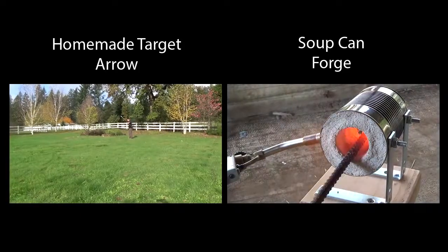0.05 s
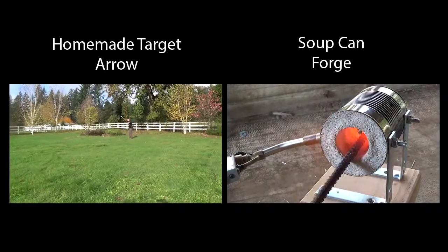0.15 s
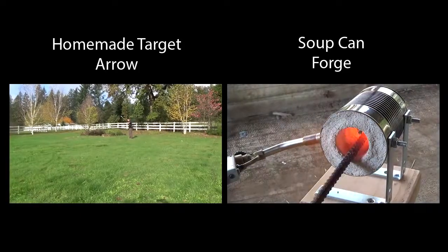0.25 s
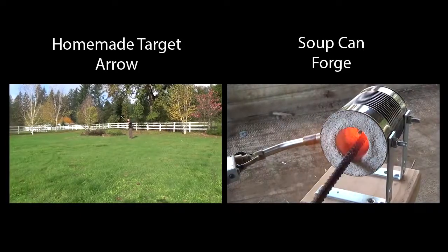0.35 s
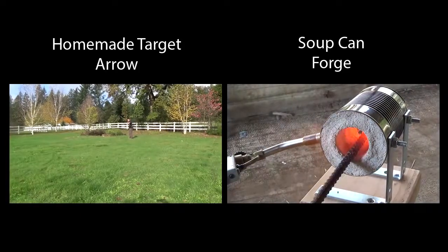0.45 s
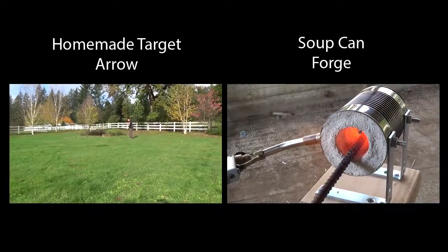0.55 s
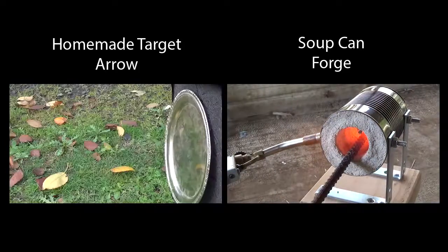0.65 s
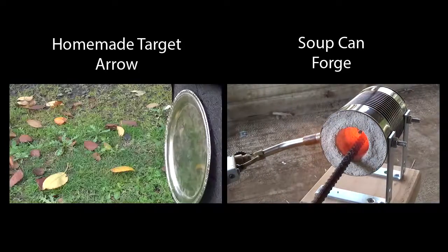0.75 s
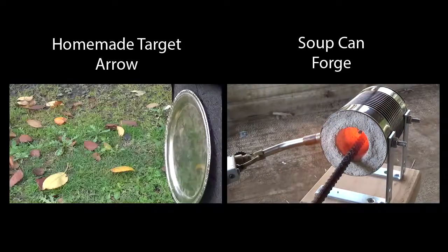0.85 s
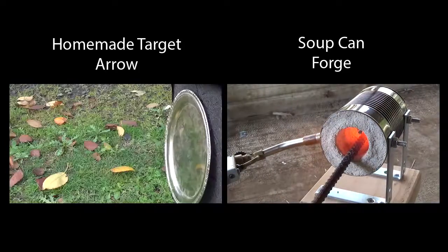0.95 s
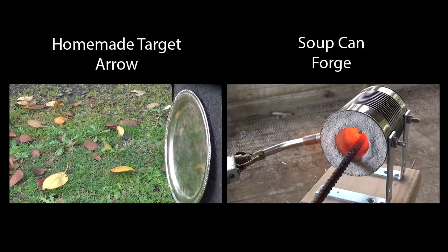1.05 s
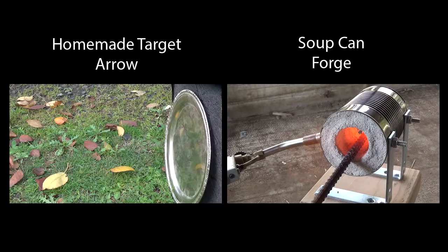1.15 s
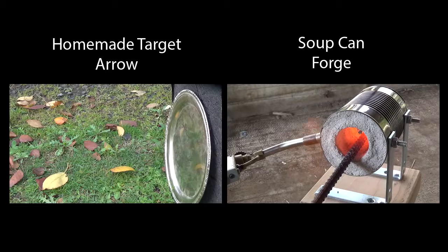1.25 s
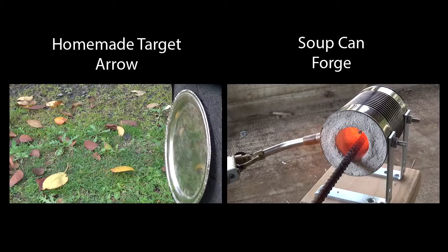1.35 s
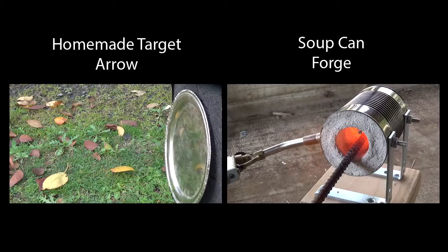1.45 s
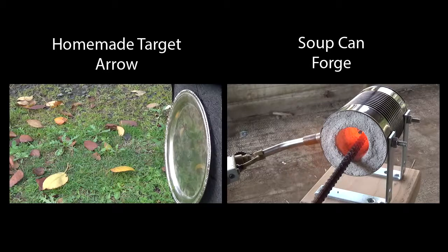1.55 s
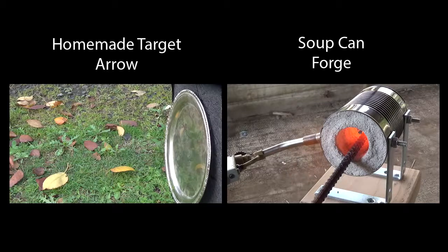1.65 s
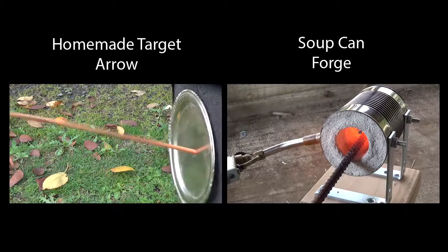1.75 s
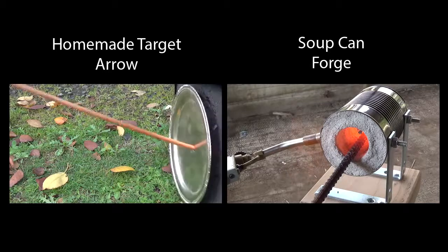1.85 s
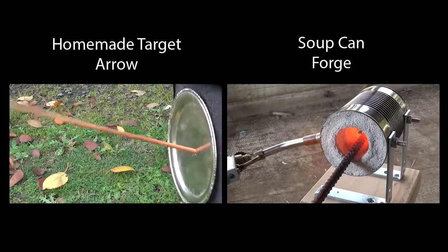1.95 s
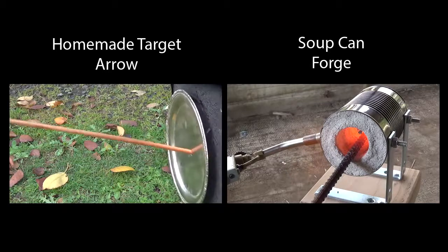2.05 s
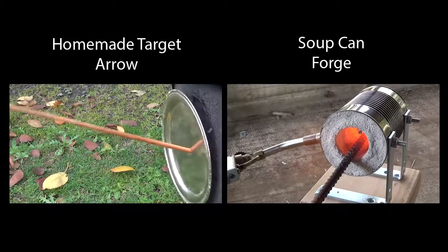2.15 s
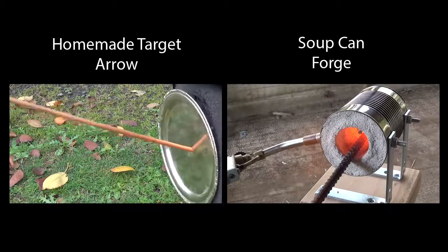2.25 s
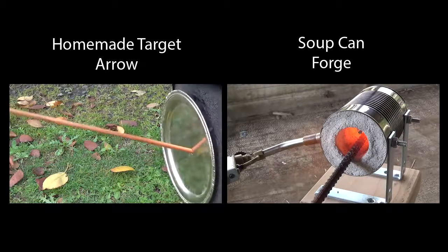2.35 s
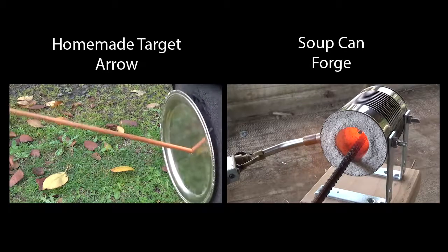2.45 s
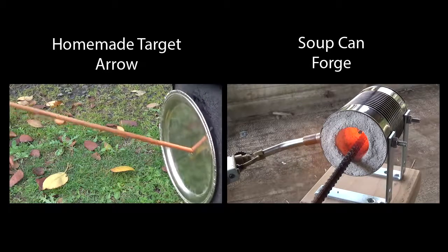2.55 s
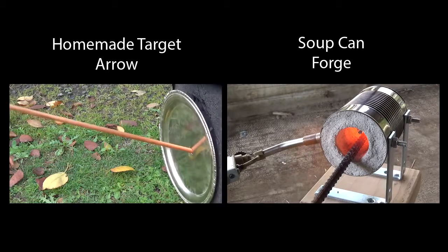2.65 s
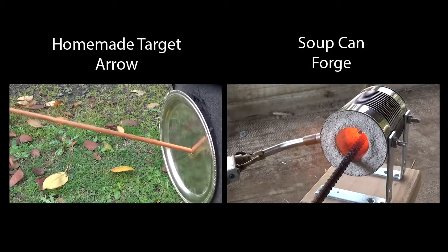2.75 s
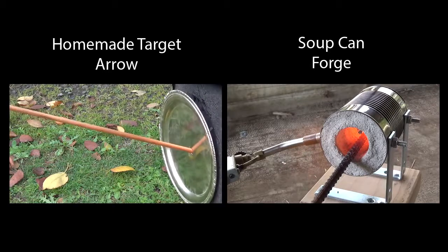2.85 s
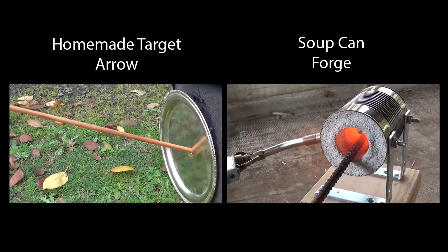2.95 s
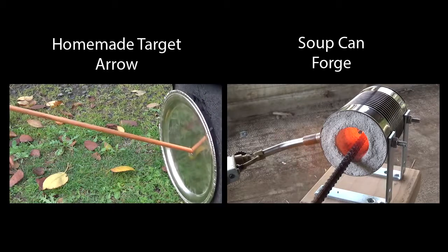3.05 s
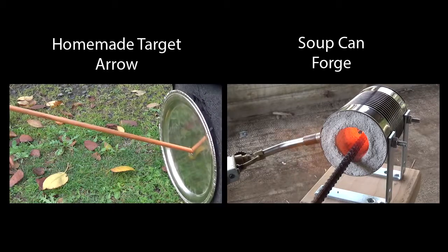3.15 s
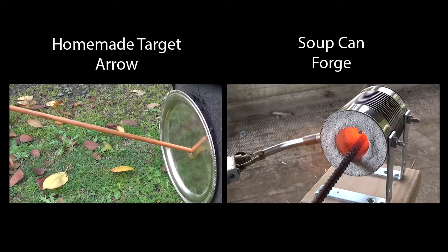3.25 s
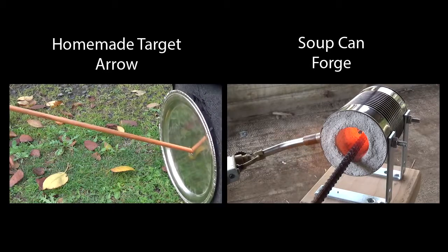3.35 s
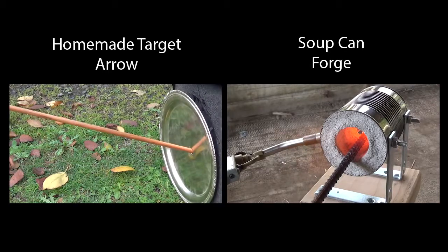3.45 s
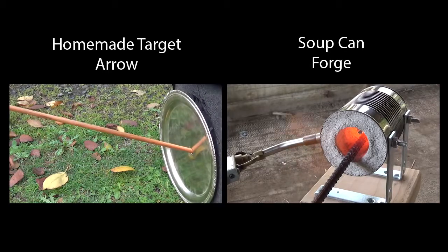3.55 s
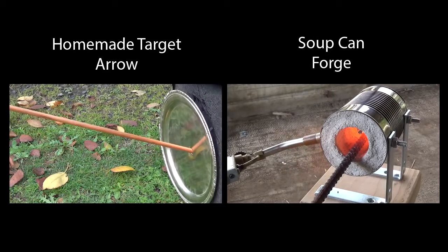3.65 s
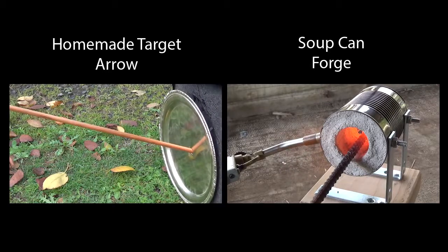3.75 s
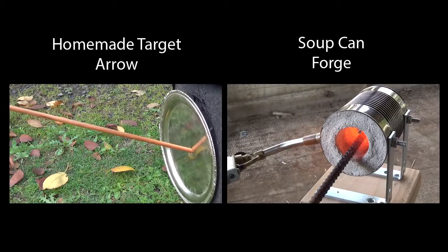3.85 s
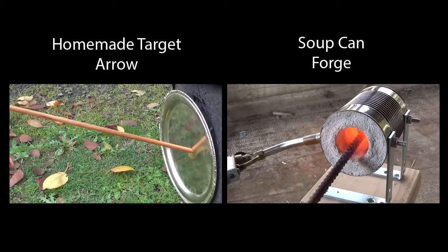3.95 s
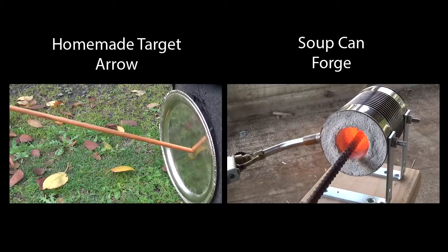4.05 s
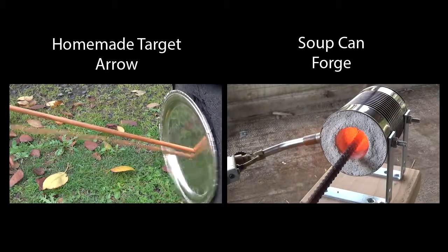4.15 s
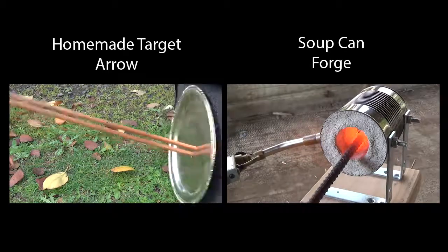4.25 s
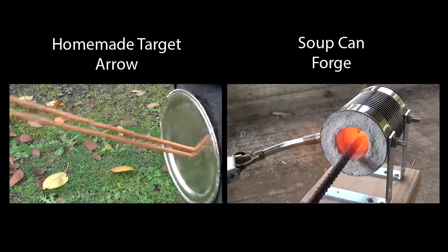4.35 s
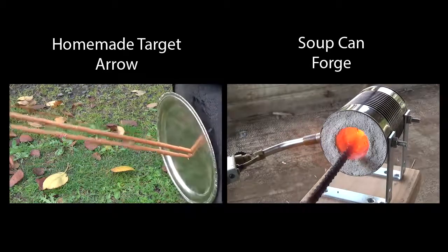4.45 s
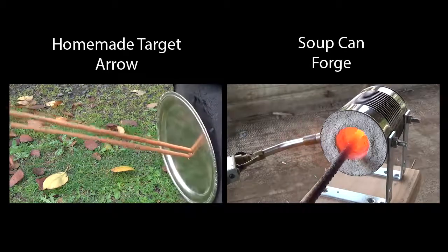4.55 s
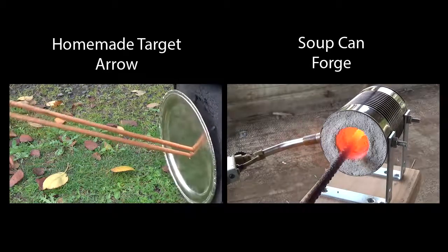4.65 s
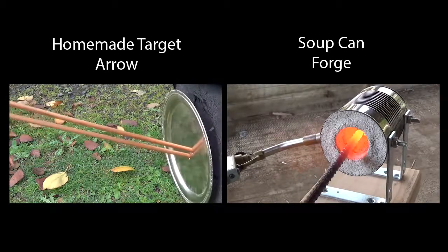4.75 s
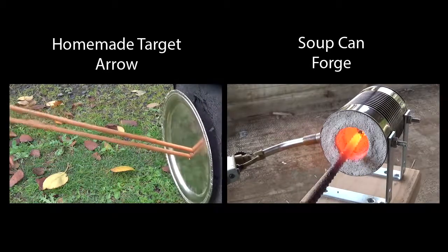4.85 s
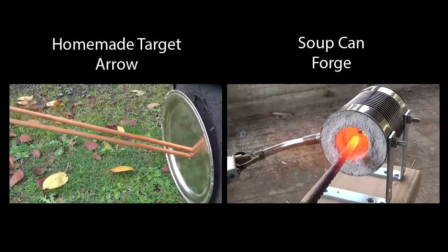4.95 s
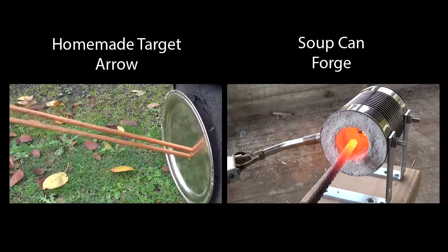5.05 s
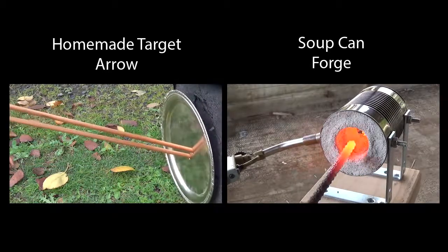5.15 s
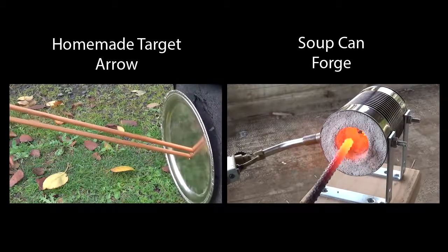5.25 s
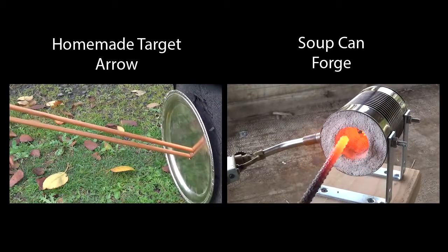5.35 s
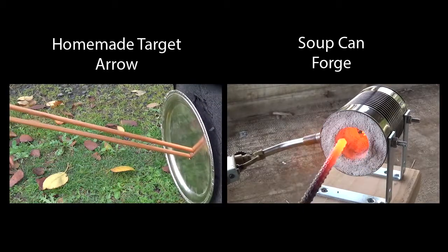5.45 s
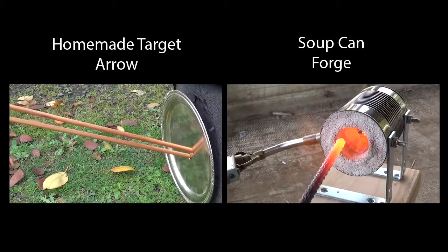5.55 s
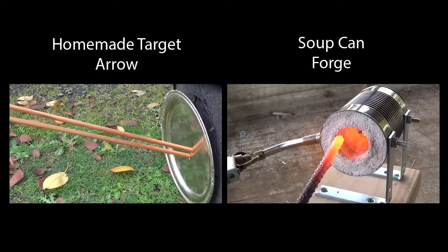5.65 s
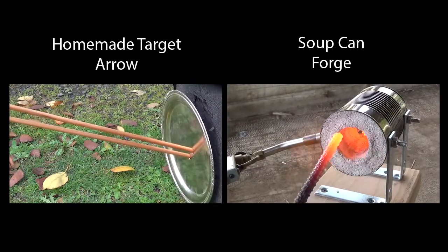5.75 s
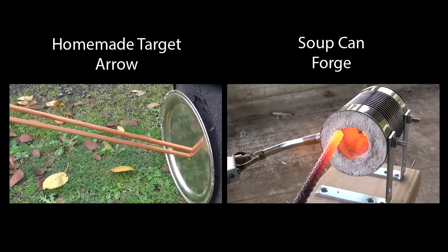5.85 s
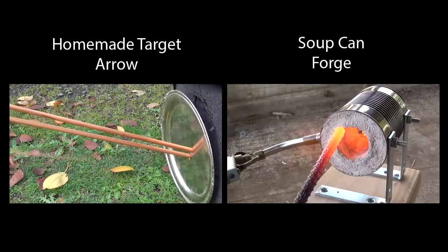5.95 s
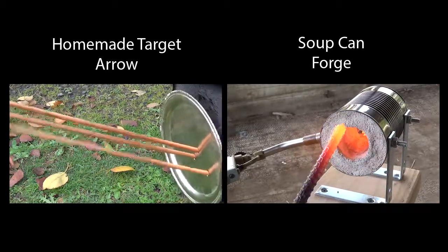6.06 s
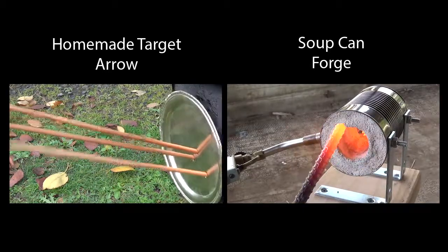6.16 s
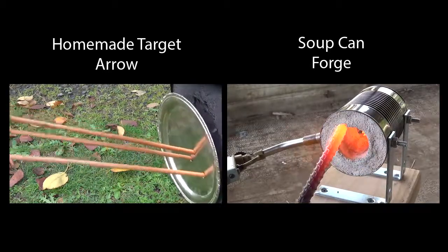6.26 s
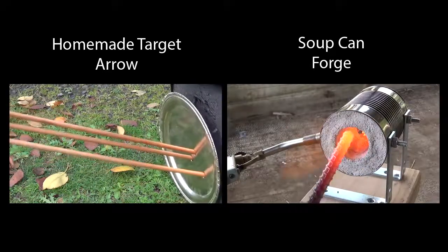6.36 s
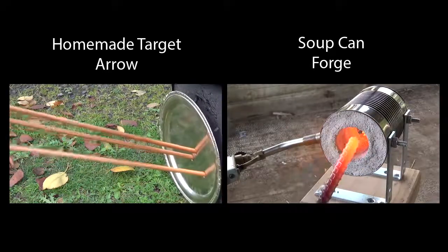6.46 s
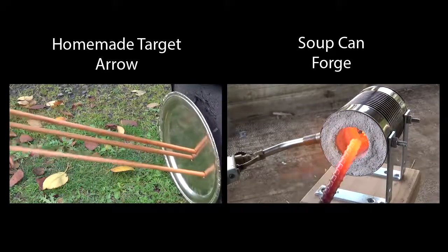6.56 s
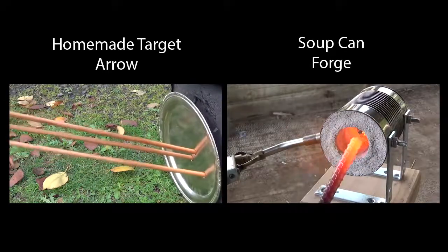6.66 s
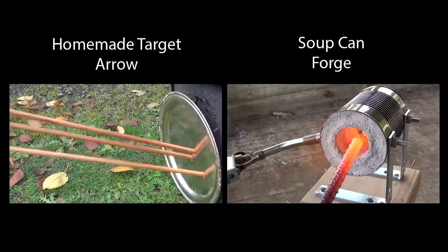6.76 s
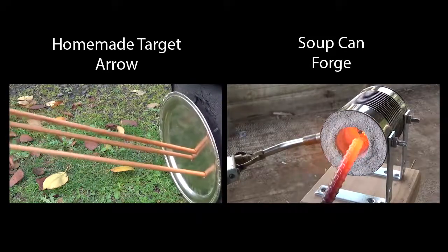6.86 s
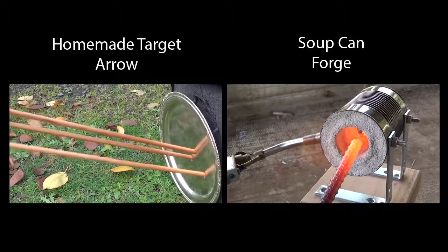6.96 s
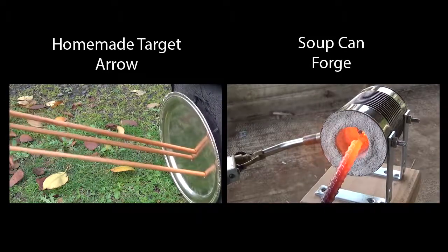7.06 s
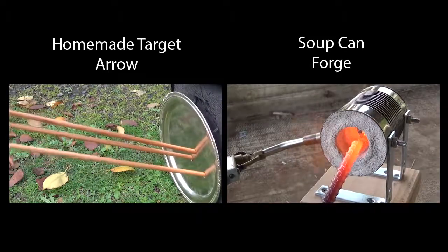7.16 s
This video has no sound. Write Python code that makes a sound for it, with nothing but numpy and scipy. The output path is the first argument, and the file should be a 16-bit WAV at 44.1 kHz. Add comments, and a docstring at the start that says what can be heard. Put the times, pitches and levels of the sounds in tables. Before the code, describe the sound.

Close bow shots punch three arrows into thin metal with rattling clangs outdoors, while a small gas forge blows steadily.

```python
"""Arrows through a metal platter

On a lawn, close to the microphone, three wooden arrows are shot through a thin metal platter. The
bowstring thumps, the point cracks through, and the sliding, rattling shaft keeps the platter ringing.
A gas torch blows steadily into a small tin-can forge, whose note shifts as an iron rod is drawn out.
Far off, an engine hums."""
import sys
import numpy as np
from scipy import signal
from scipy.fft import rfft, irfft
from scipy.io import wavfile

SR = 44100
rng = np.random.default_rng(int(sys.argv[2]) if len(sys.argv) > 2 else 0)


def file_out(sig):
    """Save sig as 16-bit WAV at sys.argv[1]."""
    # one column per channel
    cols = np.atleast_2d(sig).T
    # limit, then scale
    lim = np.clip(cols, -1, 1)
    pcm = np.round(lim * 32767).astype(np.int16)
    wavfile.write(sys.argv[1], SR, pcm)


N = 317069
TIME = np.arange(N) / SR
AGE = TIME[:SR]  # the second that follows a blow
LEFT_RIGHT = np.array([[1], [-1]])


def from_db(db):
    """Decibels to gain."""
    return 10 ** (np.asarray(db) / 20)


def rms_one(x):
    """Scale to unit rms."""
    return x / np.sqrt(np.mean(x ** 2) + 1e-20)


def at_hz(rows, hz):
    """The columns of a spectrum table, read on a log-frequency axis."""
    points, *columns = np.transpose(rows)
    return [np.interp(np.log(hz + 1e-9), np.log(points), c) for c in columns]


def bins(size):
    """Frequencies of a transform of this size."""
    return np.arange(size // 2 + 1) * SR / size + 1e-9


def treble(hz, corner_hz=5500):
    """How far a frequency belongs to the treble, 0-1."""
    return 1 / (1 + (corner_hz / hz) ** 4)


def noise(gain, size):
    """Noise with a given gain at each frequency."""
    return irfft(gain * rfft(rng.standard_normal(size)), size)


def flutter(rate_hz, size=SR):
    """A smooth random waver of unit rms."""
    return rms_one(noise(np.exp(-(bins(size) / rate_hz) ** 2), size))


def fade(t60):
    """Exponential decay, 60 dB in t60 seconds."""
    return from_db(-60 * AGE / t60)


def add(out, start_s, sound):
    """Mix in a one-second sound."""
    start = round(start_s * SR)
    out[:, start:start + SR] += sound[..., :N - start]


# Stereo picture at the microphone: freq_hz, left_minus_right_db, shot_side_db, forge_side_db
STEREO_IMAGE = [(40, -2, 3, 2), (70, -13.5, 1, -7), (142, -7, -7.5, -17), (350, -2.1, -11, -12),
                (840, -1.8, -11.5, -19.5), (1800, -0.6, -18.5, -26), (4700, -1, -12.5, -11.5),
                (11000, 0.5, -12.5, -11)]

def wide_noise(gain):
    """One second of coloured noise, much alike in both channels; rms about 1."""
    mid = noise(gain, SR)
    side = noise(gain * from_db(at_hz(STEREO_IMAGE, bins(SR))[1]), SR)
    return (mid + side * LEFT_RIGHT) / np.std(mid)


def burst(hz, octaves, t60):
    """A short contact: a hump of noise that dies away."""
    hump = np.exp(-.5 * (np.log2(bins(SR) / hz) / octaves) ** 2)
    return wide_noise(hump) * fade(t60)


def flame():
    """Spectrum of the flame's raw stereo noise, its mid at 0 dB per Hz."""
    width = from_db(at_hz(STEREO_IMAGE, bins(N))[2])
    mid, side = rfft(rng.standard_normal((2, N)))
    return np.sqrt(SR / 2) * (mid + width * side * LEFT_RIGHT)


# Resonances of can and burner: rod_in_hz, rod_out_hz, nominal_width_hz, rod_in_db, rod_out_db
CAN_RESONANCES = [(682, 524, 155, -83.5, -85.5), (1009, 956, 99, -80, -79), (1500, 1685, 155, -76, -78.5),
                  (1810, 1430, 250, -87.5, -84), (2223, 2194, 72, -82, -84),
                  (2985, 2996, 124, -81.5, -83.5), (3893, 3870, 110, -92, -94.5),
                  (4990, 5040, 400, -99, -97), (6030, 6080, 220, -100, -99), (7460, 7170, 370, -106, -101),
                  (10130, 10000, 430, -103, -107)]

def tin_can(rod):
    """Spectrum of the flame resonating in the can, with the rod in (0) or out (1)."""
    hz, power = bins(N), 0
    for *centres_hz, width_hz, in_db, out_db in CAN_RESONANCES:
        detuning = (hz - centres_hz[rod]) / (0.83 * width_hz)
        power += (from_db((in_db, out_db)[rod]) / (1 + detuning ** 2)) ** 2
    return np.sqrt(power) * flame()


# Broad roar of the flame: freq_hz, density_db
FLAME_ROAR = [(20, -112), (40, -99), (70, -93), (150, -86), (230, -85.5), (300, -88.5), (520, -87.5),
              (850, -85), (1230, -90.5), (1750, -85.5), (2600, -94), (3350, -104), (6000, -105),
              (11000, -106)]
# The torch's drift in four stretches, each level taken about its mean: time_s, roar_db, hiss_db
TORCH_DRIFT = [
    [(0.1, -49.5, -65.5), (1.07, -49, -63), (1.7, -49, -63)],
    [(2.4, -49.5, -65), (3.724, -50, -65.5), (4.1, -49.5, -64.5)],
    [(4.7, -49.5, -62), (4.862, -49, -65), (5.9, -50, -65.5)],
    [(6.5, -49, -62.5), (6.982, -52.5, -67), (7.15, -51.5, -66.5)],
]

def forge(jet_hz=3500, pull_middle_s=4, pull_ease_s=0.34, waver_db=3.5, hiss_swing=1.7):
    """The torch roars in the can, whose note moves as the rod comes out; the jet whistles above."""
    times, roar_db, hiss_db = np.concatenate(TORCH_DRIFT).T
    roar_db, hiss_db = np.interp(TIME, times, roar_db), np.interp(TIME, times, hiss_db)
    roar_db = roar_db - roar_db.mean() - 0.28
    hiss_db = hiss_swing * (hiss_db - hiss_db.mean()) - 0.6
    jet_share = 1 / (1 + (jet_hz / bins(N)) ** 8)

    def burn(spectrum, jet_db):
        """The lows follow the roar's level, the highs the jet's."""
        lows = irfft(spectrum * (1 - jet_share), N)
        highs = irfft(spectrum * jet_share, N)
        return from_db(roar_db) * lows + from_db(jet_db) * highs

    roar = from_db(at_hz(FLAME_ROAR, bins(N))[0]) * flame()
    out = burn(roar, .5 * hiss_db)
    whistle_db = 0.77 * hiss_db + waver_db * flutter(5, N)
    drawn = 1 / (1 + np.exp((pull_middle_s - TIME) / pull_ease_s))
    for rod, share in enumerate([1 - drawn, drawn]):
        out += np.sqrt(share) * burn(tin_can(rod), whistle_db)
    return out


# Two swells of an engine far off: start_s, length_s, pitch_hz, glide_hz_per_s, relative_db
ENGINE_SWELLS = [(.6, 2.65, 75.6, 7.5, -62), (3.902, 1.4, 64, -3.5, -64.5)]

def engine(level_db=-5, waver_db=2, edge_s=0.26, fade_db_per_s=3.5):
    """Only the wavering firing note carries to the microphone, gliding and fading in each swell."""
    out = 0
    for start_s, length_s, hz, glide, db in ENGINE_SWELLS:
        age = np.clip(TIME - start_s, 0, length_s)
        edges = np.minimum(np.minimum(age, length_s - age) / edge_s, 1)
        note = np.sqrt(2) * np.sin(2 * np.pi * (hz + .5 * glide * age) * age)
        out += from_db(db - fade_db_per_s * age) * edges * note
    return from_db(level_db + waver_db * flutter(6, N)) * out


# Modes of bow and string: pitch_hz, relative_db, t60_s
BOW_MODES = [(65, -26, 0.041), (128, -13, 0.083), (193.5, -2.5, 0.16), (378, -14.5, 0.13)]
# The bow is loosed, close by: start_s, brush_db, slap_db
RELEASES = [(1.8032, -43, -28), (4.2138, -40, -51), (6.0245, -39.5, -46)]

def bow(rush_db=-43.5, thump_db=-33.5, brush_lead_s=.015, thump_lag_s=.00305, attack_s=.00063):
    """The shaft brushes the bow, the string slaps taut, the arrow rushes off and the limbs thump."""
    out = np.zeros((2, N))
    attack = 1 - np.exp(-AGE / attack_s)
    thump = sum(from_db(db) * np.sin(2 * np.pi * hz * AGE) * fade(t60) for hz, db, t60 in BOW_MODES)
    for start_s, brush_db, slap_db in RELEASES:
        add(out, start_s - brush_lead_s, from_db(brush_db) * burst(2120, octaves=.41, t60=.11) * attack)
        add(out, start_s, from_db(slap_db) * burst(7000, octaves=5.4, t60=.027) * attack)
        add(out, start_s, from_db(rush_db) * burst(1000, octaves=2.6, t60=.2) * attack)
        add(out, start_s + thump_lag_s, from_db(thump_db) * thump)
    return out


# How the platter takes up and loses energy: freq_hz, base_t60_s, slide_share, blow_energy_share
RINGING = [(304, 1, 0.67, 1), (1010, 0.58, 0.73, 0.25), (2180, 0.5, 0.63, 0.35), (3900, 0.38, 0.53, 0.085),
           (6140, 0.36, 0.43, 0.57), (9400, 0.22, 0.28, 0.5)]

def ring_envelope(hz, slide_s, rasp_s, ring_factor):
    """The point kicks a mode, then the sliding shaft feeds it; a slowing shaft feeds only low modes."""
    t60, slide_share, blow_share = at_hz(RINGING, hz)
    blow_share = np.clip(blow_share, .02, 1)
    feed_s = slide_share * (slide_s + (rasp_s - slide_s) * treble(hz))
    feed = np.exp(-(AGE / feed_s) ** 2)
    feed *= (1 - blow_share) / feed.sum()
    feed[0] += blow_share
    kept_per_sample = from_db(-120 / (t60 * ring_factor * SR))
    power = signal.lfilter([1], [1, -kept_per_sample], feed)
    return rms_one(np.sqrt(power + 1e-20))


# Spectrum of the platter's weaker modes: freq_hz, relative_db
WEAK_MODES = [(120, -15.5), (300, -12), (620, -7.5), (900, -4), (1120, 3), (1300, -8.5), (2250, -3.5),
              (3000, -3.5), (3750, -0.5), (4200, -8.5), (4650, -0.5), (5000, -8), (6100, -8.5),
              (11000, -6.5)]

def clash(motion, treble_db, bass_db, grain, rattle_db=0.7):
    """The crowd of weak modes rings band by band, shaken by the rattling shaft."""
    hz, edges = bins(SR), np.geomspace(100, 12000, 19)
    tilt_db = treble_db * treble(hz) + bass_db * (1 - treble(hz, corner_hz=1430))
    colour = grain * from_db(at_hz(WEAK_MODES, hz)[0] + tilt_db)
    out, energy = 0, 0
    for low, high in zip(edges, edges[1:]):
        band = colour * (hz >= low) * (hz < high)
        power = np.sum(band ** 2)
        out += np.sqrt(power) * wide_noise(band) * ring_envelope(np.sqrt(low * high), *motion)
        energy += power
    return out / np.sqrt(energy) * from_db(rattle_db * flutter(90))


# The platter's strong modes; each arrow lands on another spot, so their relative levels vary:
# pitch_hz, ring_factor, first_arrow_db, second_arrow_db, third_arrow_db
STRONG_MODES = [(920, 1, -43, -46, -49), (1005, 1, -43, -48, -47), (1116, 0.9, -44, -45, -45),
                (1220, 1.1, -45, -55, -53), (1949, 1.3, -37, -42, -44), (2505, 1.1, -43, -46, -52),
                (2608, 1, -41, -43, -51), (2860, 1, -42, -46, -50), (2988, 1.1, -38, -40, -48),
                (3013, 1.1, -38, -40, -47), (3158, 1, -42, -44, -46), (3258, 1.1, -39, -44, -45),
                (3378, 1.2, -40, -48, -48), (3458, 1, -43, -50, -54), (3595, 0.9, -42, -46, -48),
                (3712, 0.8, -42, -44, -41), (3802, 0.75, -39, -40, -37), (3930, 0.75, -45, -48, -44),
                (4230, 1, -46, -50, -50), (4464, 0.9, -43, -48, -50), (4643, 1, -38, -44, -45),
                (4715, 1, -39, -44, -45), (5078, 1, -48, -50, -49), (5781, 1, -44, -48, -46),
                (5860, 1, -43, -47, -45), (6220, 1, -48, -51, -52), (6500, 1, -48, -49, -51),
                (8564, 1, -43, -45, -46), (9772, 0.9, -46, -49, -47), (10320, 0.9, -46, -48, -47)]

def ring(levels_db, slide_s, rasp_s, ring_factor, spread_rad=0.18):
    """The strong modes, nudged in size and phase by the chattering shaft, left and right out of step."""
    out = 0
    for (hz, lasting, *_), db in zip(STRONG_MODES, levels_db):
        phase = 2 * np.pi * (hz * AGE + rng.random()) + spread_rad * rng.normal() * LEFT_RIGHT
        tone = (1 + .4 * flutter(22)) * np.sin(phase) + .4 * flutter(22) * np.cos(phase)
        envelope = ring_envelope(hz, slide_s * lasting, rasp_s, ring_factor * lasting)
        out += from_db(db) * rms_one(tone * envelope)
    return out


# Arrows striking the platter at close range: start_s, crack_db, modes_db, slide_s, rasp_s,
# ring_factor, treble_db, bass_db, quiver_db, quiver_s, swing_s, first_knock_db
ARROWS = [(1.8356, -23.5, -8.5, 0.15, 0.16, 0.94, 2, 3, -51.5, 0.34, 0.072, -28.5),
          (4.2464, -25, -9.5, 0.15, 0.012, 0.98, 2.5, 5, -47, 0.1, .079, -34),
          (6.059, -26, -9, 0.044, 0.0059, 0.87, 5.5, 7.5, -47, 0.28, .087, -34)]

def platter(clash_db=-11.5, tear_db=-2, sway_depth=0.26, sway_hz=32):
    """Each point cracks and tears through the sheet and sets it ringing; the shaft is left quivering."""
    out = np.zeros((2, N))
    grain = from_db(3.5 * flutter(600)[:len(bins(SR))])  # the weak modes lie unevenly
    sway = 1 + sway_depth * np.cos(2 * np.pi * sway_hz * AGE)
    for arrow, levels_db in zip(ARROWS, np.transpose(STRONG_MODES)[2:]):
        start_s, crack_db, modes_db, *motion, treble_db, bass_db, quiver_db, quiver_s, _, _ = arrow
        add(out, start_s, from_db(crack_db + clash_db) * clash(motion, treble_db, bass_db, grain))
        add(out, start_s, from_db(modes_db) * ring(levels_db, *motion))
        add(out, start_s, from_db(crack_db) * burst(1070, octaves=1.9, t60=.055))
        add(out, start_s, from_db(crack_db + tear_db) * burst(10300, octaves=.54, t60=.074))
        quiver = sway * np.exp(-(AGE / quiver_s) ** 2)  # friction in the hole stills the shaft
        add(out, start_s, from_db(quiver_db) * burst(184, octaves=.38, t60=6.7) * quiver)
    return out


def knock(centre_hz, t60, octaves=0.32, tick_db=-6, modes_db=41):
    """A tick of the shaft sets the platter modes near its pitch ringing again."""
    modes = 0
    for hz, lasting, *levels_db in STRONG_MODES:
        nearness = np.exp(-.5 * (np.log2(hz / centre_hz) / octaves) ** 2)
        if nearness > .05:
            tone = np.sin(2 * np.pi * (hz * AGE + rng.random()))
            modes += nearness * from_db(np.mean(levels_db)) * tone * fade(1.1 * t60 * lasting)
    return from_db(tick_db) * burst(centre_hz, .28, t60) + from_db(modes_db) * modes


# Hard knocks that bend the whole sheet and wake its low modes: start_s, level_db, pitch_hz, tick_t60_s
HARD_KNOCKS = [(1.872, -24, 1070, 0.044), (1.962, -31, 1950, 0.22), (2.024, -32, 1940, 0.11),
               (4.355, -30.5, 845, 0.09)]

def rattle(first_knock_s=.037, loss_db=7.5):
    """Each stuck shaft knocks in its hole once a swing, ever softer; a few knocks are hard and low."""
    out = np.zeros((2, N))
    for start_s, *_, swing_s, db in ARROWS:
        for swing in range(5):
            knock_s = start_s + first_knock_s + swing * swing_s
            add(out, knock_s, from_db(db - swing * loss_db) * knock(centre_hz=3960, t60=.055))
    for start_s, db, hz, t60 in HARD_KNOCKS:
        add(out, start_s, from_db(db) * knock(hz, t60))
    return out


def scene():
    """On the lawn: close shots over the forge and the far engine; the bass leans to the right."""
    mix = platter() + rattle() + bow() + forge() + engine()
    balance = from_db(at_hz(STEREO_IMAGE, bins(N))[0] * LEFT_RIGHT / 2)
    return irfft(rfft(mix) * balance, N)


def record(dry, low_cut_hz=45, high_cut_hz=11090):
    """The microphone sheds the deepest bass; the top is cut steeply."""
    thinned = signal.sosfilt(signal.butter(2, low_cut_hz, "high", fs=SR, output="sos"), dry)
    return signal.sosfilt(signal.ellip(14, .1, 80, high_cut_hz, fs=SR, output="sos"), thinned)


dry = scene()
out = record(dry)
file_out(out)
```